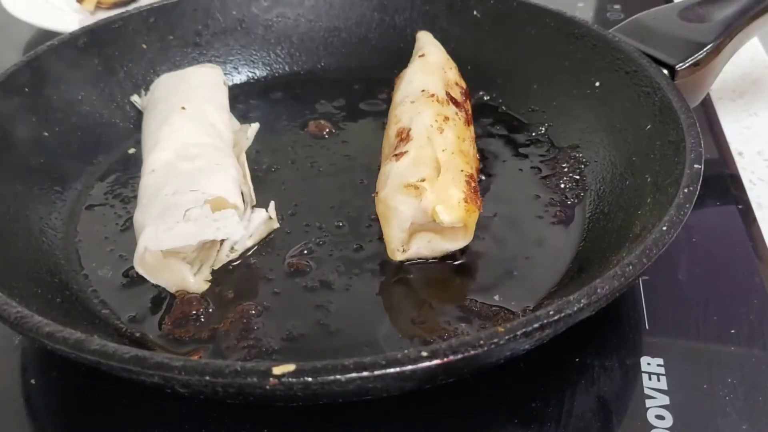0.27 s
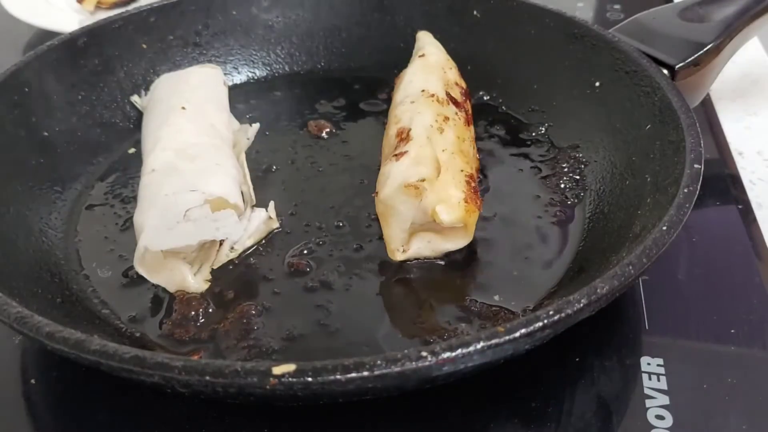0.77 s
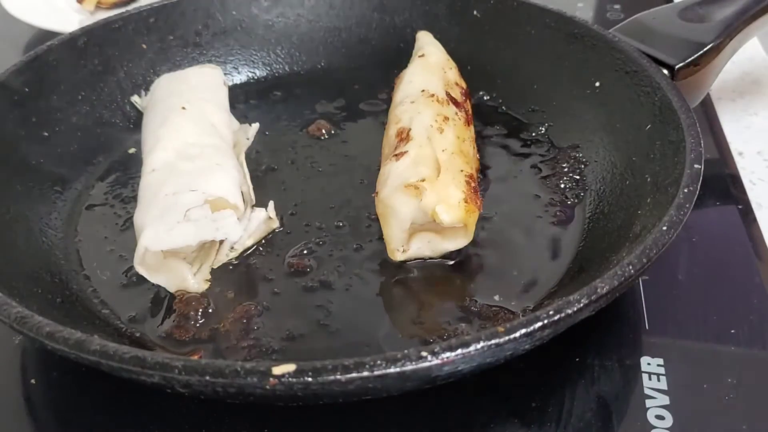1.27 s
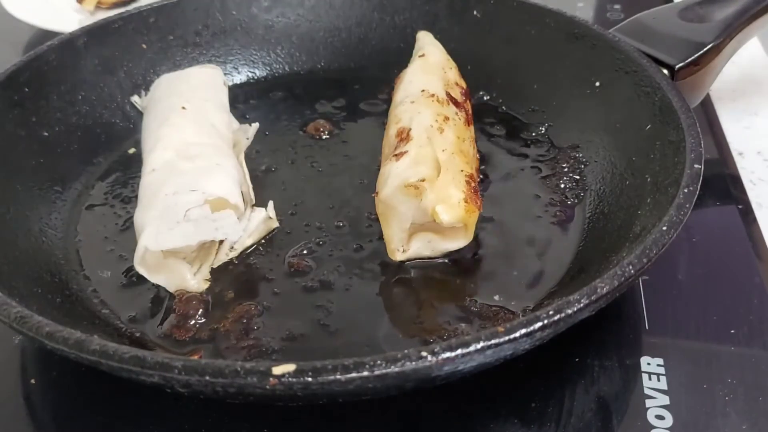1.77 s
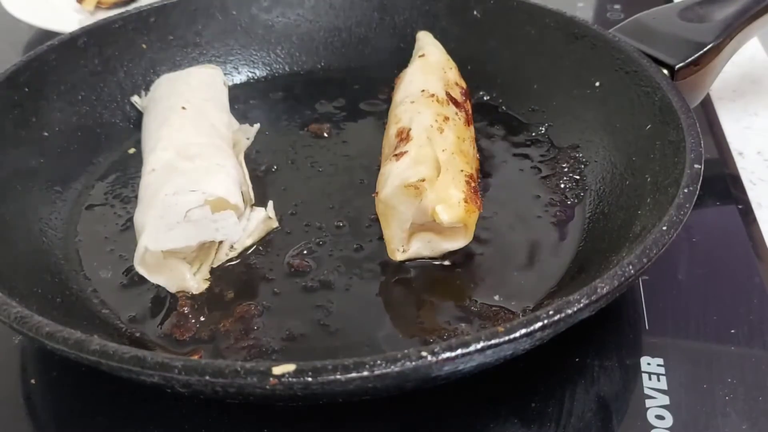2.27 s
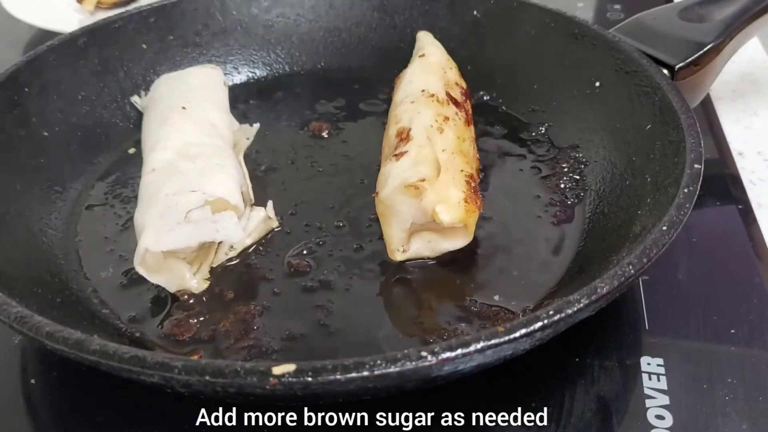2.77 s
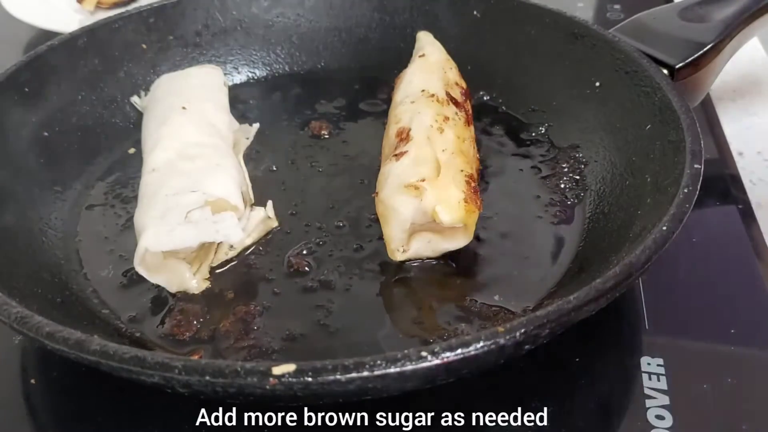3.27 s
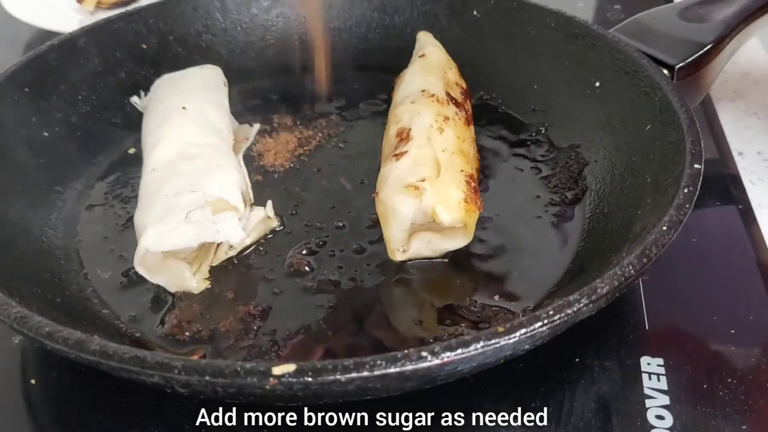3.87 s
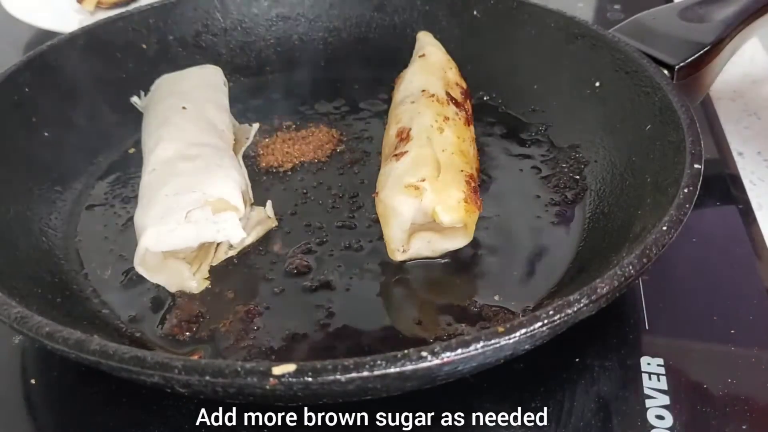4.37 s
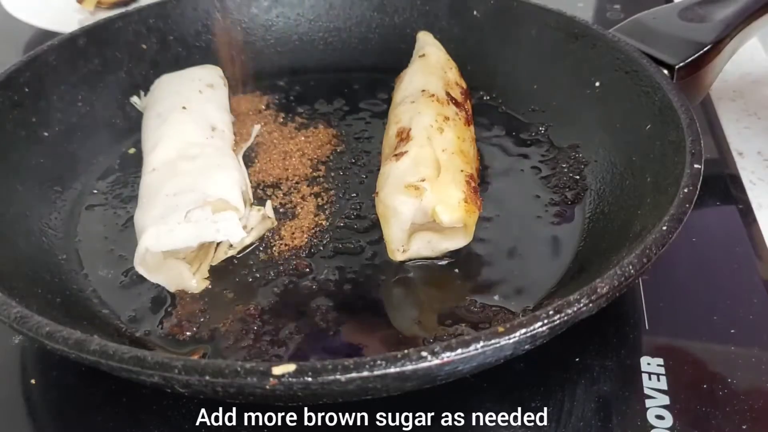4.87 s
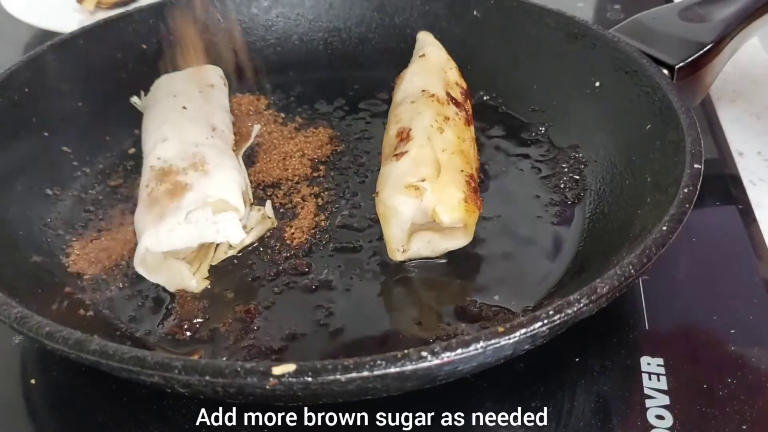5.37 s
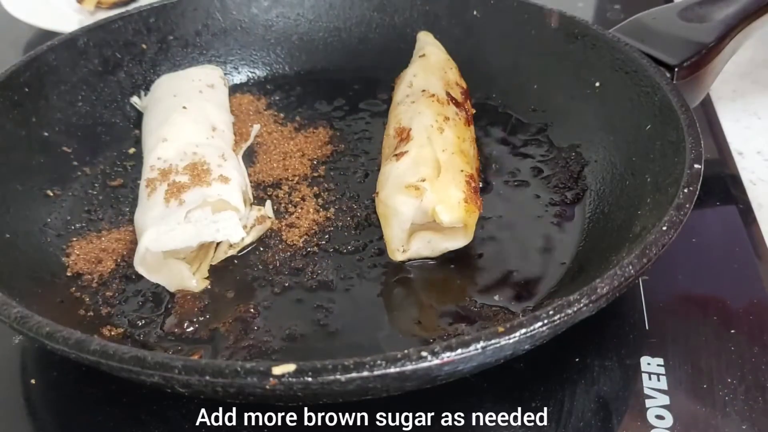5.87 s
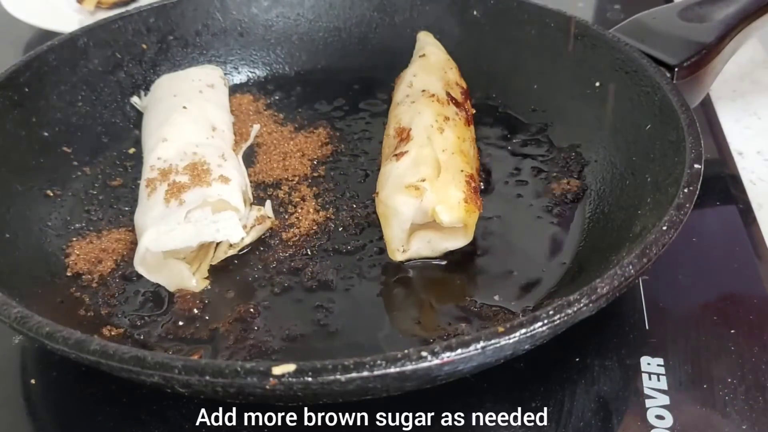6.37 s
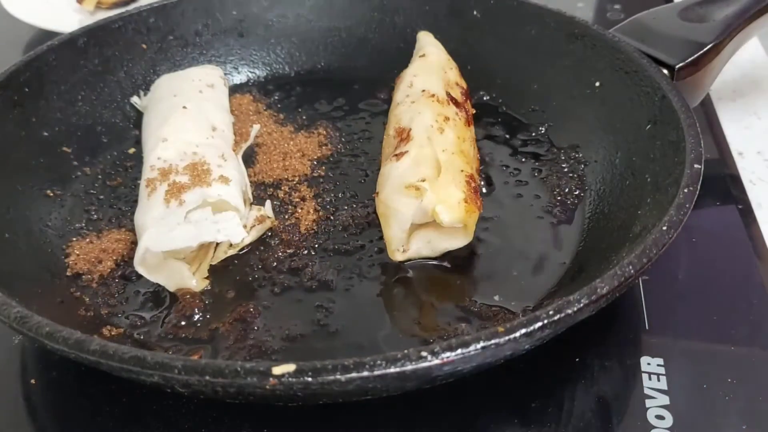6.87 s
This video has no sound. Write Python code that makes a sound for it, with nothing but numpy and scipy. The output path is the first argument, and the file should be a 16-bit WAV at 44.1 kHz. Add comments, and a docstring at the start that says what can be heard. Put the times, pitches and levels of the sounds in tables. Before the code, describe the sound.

Close, dry stereo phone pickup of a kitchen: loud crisp creases of a film packet, irregular and bunched, with hollow body knocks, first leaning left, then right. A soft steady oil sizzle and low room hum sit far below. After the packet stops, only a few light rustles and soft knocks remain, while the frying pan grows lively with high ticking bubbles, pops and spitting clicks.

```python
"""In a kitchen, a stiff sugar bag is handled close to a phone, first left, then right, while rolls fry gently.
Noise in many bands makes the bag's creases snap and rustle; dying tones make its panels ring and its body thump.
Oil hisses as coloured noise, crackles in random ticks and spits in clicks; bubbles pop with a brief ring,
more so once sugar lands in the pan. A low kitchen hum, the bass of the same coloured noise, lies under the sizzle."""
import sys
import numpy as np
from scipy import signal
from scipy.fft import rfft, irfft
from scipy.io import wavfile

SR = 44100
rng = np.random.default_rng(int(sys.argv[2]) if len(sys.argv) > 2 else 0)


def log_audio(samples):
    """Write samples as a 16-bit WAV file to the path given in sys.argv[1]."""
    # one column per channel
    frames = np.atleast_2d(samples).T
    # limit to full scale, then quantise
    limited = np.clip(frames, -1, 1)
    pcm = np.round(limited * 32767).astype(np.int16)
    wavfile.write(sys.argv[1], SR, pcm)


N = 313992
TIME = np.arange(N) / SR
BAG_LAG, PAN_LAG = 20, 8  # samples by which the left port hears later, before the bag's sides are swapped

# creases of the bag snapping; levels before trims and filters:
# start_s, body_db (1.2-4 kHz), crisp_top_db (above 5 kHz)
CREASE_SNAPS = [(0.336, -35, -24), (0.419, -24, -18.5), (0.627, -36.5, -34), (0.638, -33.5, -29.5),
                (0.681, -53, -35), (0.994, -32.5, -27.5), (0.999, -28, -33), (1.009, -45, -53),
                (1.021, -34.5, -48), (1.036, -39, -22), (1.228, -28.5, -30), (1.313, -33.5, -48),
                (1.411, -36, -32), (1.459, -39, -38), (1.4865, -43, -34), (1.523, -39, -33.5),
                (1.559, -26.5, -30), (1.604, -39, -34), (1.629, -27.5, -57), (1.648, -26, -24.5),
                (1.658, -46, -27), (1.671, -38, -35), (1.692, -32, -23), (1.702, -32.5, -25.5),
                (1.722, -32, -56), (1.744, -39, -33.5), (1.774, -18.5, -23.5), (1.81, -29.5, -21),
                (1.883, -30, -45), (1.921, -30, -36), (1.953, -27.5, -20), (1.962, -26.5, -33),
                (2.013, -24, -26.5), (2.116, -24, -31), (2.141, -51, -34), (2.151, -30.5, -25),
                (2.163, -26.5, -23), (2.255, -28.5, -22), (2.275, -35, -39), (2.321, -32.5, -24),
                (2.362, -33.5, -25), (2.446, -31.5, -37), (2.513, -19.5, -15), (2.524, -28, -20),
                (2.596, -24.5, -24.5), (2.654, -20, -17.5), (2.677, -30.5, -23.5), (2.702, -32, -34),
                (2.834, -36.5, -35), (2.848, -33, -35), (2.864, -28.5, -26.5), (2.905, -28.5, -22),
                (2.945, -31, -29), (2.974, -29.5, -43), (3.035, -30, -21.5), (3.085, -27, -27),
                (3.141, -37, -21), (3.253, -34, -23.5), (3.296, -27, -9.5), (3.367, -31.5, -20.5),
                (3.386, -36, -27.5), (3.488, -38.5, -25.5), (3.53, -44.5, -21.5), (3.6, -40, -22)]
# squeezes of the bag; levels before the mix: start_s, hold_s, rustle_db, rumble_db
HAND_SQUEEZES = [(0.332, 0.0077, -37.5, -28), (0.632, 0.0066, -47.5, -44), (1.013, 0.062, -41, -36.5),
                 (1.205, 0.026, -47, -36.5), (1.367, 0.24, -56.5, -53), (1.667, 0.013, -52, -58),
                 (1.804, 0.011, -44.5, -34), (1.945, 0.0047, -46, -32), (2.075, 0.02, -50, -36.5),
                 (2.416, 0.1, -52, -34.5), (2.618, 0.081, -45, -41), (2.881, 0.22, -53.5, -38.5),
                 (3.734, 0.01, -50.5, -52.5), (4.564, 0.035, -52, -48.5), (5.116, 0.027, -50.5, -51.5)]


def bag():
    """Patches of film from large (low) to small (high) ring when a crease cracks, each crack in its own colour."""
    # tone of the bag's film: frequency_hz, gain_db
    film_tone = [(40, 1.5), (100, 3.5), (400, 14), (720, 15), (850, 7), (1500, 10.5), (1770, 13.5),
                 (1900, 10.5), (2110, 13.5), (2400, 8), (3200, 8.5), (4200, 6.5), (5000, 4), (10500, 1),
                 (12500, -2.5), (16000, -1)]
    s, body_db, top_db = np.transpose(CREASE_SNAPS)
    rustle, rumble = (squeeze(db) for db in np.transpose(HAND_SQUEEZES)[2:])
    air = ports(BAG_LAG, alike=0.4)
    creases = grains(rate=500, spread_db=5.5, t60=0.014)
    out = 0
    for hz in np.geomspace(60, 15000, num=17):
        # the level slides from body to crisp top over the octave above 2.3 kHz
        crisp = np.clip(np.log2(hz / 2300), 0, 1)
        scatter_db = 4.5 * rng.standard_normal(len(s))
        crack_db = crisp * top_db + (1 - crisp) * body_db + scatter_db
        snap = fade(s, crack_db, t60=0.0044)
        tail = fade(s, crack_db - 14.5, t60=0.068 + 40 / hz)
        crack = snap + tail
        own = grains(rate=90, spread_db=6.5, t60=0.079 + 8 / hz)
        if hz < 900:
            shake = undb(-13.0) * crack + rumble * (0.2 * creases + 0.091 * own)
        else:
            shake = undb(-5.5) * crack + rustle * (0.5 * creases + 0.18 * own + 0.18)
        # the instant the crease flips
        tick = fade(s, crack_db - 2.5, t60=0.0005)
        patch = band(air * shake + delay_left(tick, BAG_LAG), hz / 1.19, hz * 1.19)
        # neighbouring patches alternate in sign and so add up evenly
        out = patch - out
    return np.array([colour(x, film_tone) for x in out])


def squeeze(level_db):
    """Gain of the hand's work: each squeeze swells, holds and lets go."""
    grip_db_per_s, relax_db_per_s = 494, 161  # swell of the squeeze, settling of the film
    s, hold = np.transpose(HAND_SQUEEZES)[:2, :, None]
    swell_db = grip_db_per_s * np.maximum(s - TIME, 0)
    settle_db = relax_db_per_s * np.maximum(TIME - s - hold, 0)
    return undb(level_db[:, None] - (swell_db + settle_db)).sum(axis=0)


def panels():
    """Each crack leaves two flat panels of the bag ringing briefly, a low and a high one, at random pitches."""
    s, body_db = np.transpose(CREASE_SNAPS)[:2]
    low, high = rng.random((len(s), 2)).T
    low_ring = chimes(s, body_db - 8.5, 380 + 350 * low, cycles=23.4)
    high_ring = chimes(s, body_db - 14.0, 1700 + 600 * high, cycles=74)
    return delay_left(low_ring + high_ring, BAG_LAG)


def thumps():
    """Soft knocks: a few cycles at a low pitch with a rough tail, and one longer hollow tone."""
    # dull knocks, mostly of the bag's body; level before trims: start_s, level_db, pitch_hz
    knock_events = [(0.31, -30.5, 87.5), (0.405, -24, 279), (0.995, -24, 230), (1.051, -26, 201),
                    (1.209, -15.5, 400), (1.622, -18.5, 473), (1.779, -22, 670), (1.951, -29.5, 126),
                    (2.119, -27, 131), (2.418, -23, 236), (2.512, -10.5, 514), (2.647, -16.5, 390),
                    (4.56, -41, 203), (4.712, -26, 580), (4.779, -22, 970), (6.013, -26, 520),
                    (6.642, -45, 87), (6.899, -30, 530)]
    # a short hollow tone; level before the mix: start_s, level_db, pitch_hz
    hollow_tone = [(5.13, -47, 367)]
    s, level_db, pitch_hz = np.transpose(knock_events)
    knock = chimes(s, level_db - 1, pitch_hz, cycles=5.5)
    rough_tail = rings(s, level_db - 14, pitch_hz, spread=1.252, cycles=22.4)
    hoot = chimes(*np.transpose(hollow_tone), cycles=90)
    return delay_left(knock + rough_tail + hoot, BAG_LAG)


def pops():
    """A bursting bubble ticks and rings at its own pitch; the pan wall sends each port a wider, longer echo."""
    # bubbles that burst with a ring; level before trims: start_s, level_db, ring_hz
    bursts = [(0.0982, -32, 6460), (0.5726, -35.5, 5850), (0.7856, -33.5, 5770), (1.4626, -26, 6100),
              (2.3765, -27, 7300), (3.8033, -24, 5700), (3.8134, -31, 6800), (4.0652, -28.5, 6000),
              (4.2712, -23.5, 4580), (4.6503, -29, 5360), (4.8339, -27, 9950), (5.0574, -24, 6300),
              (5.221, -24, 6740), (5.2774, -24, 8900), (5.3448, -27, 6140), (5.4131, -29.5, 6750),
              (5.5862, -20, 8300), (5.6077, -25, 8400), (5.6521, -30, 5500), (5.7129, -21.5, 5500),
              (5.7633, -26.5, 4930), (5.8845, -25, 8500), (5.9065, -26, 5960), (5.9184, -23, 6360),
              (5.9504, -19.5, 6870), (5.9674, -25, 8660), (6.0407, -24.5, 8000), (6.0611, -24.5, 6820),
              (6.0721, -23, 4590), (6.098, -23.5, 7800), (6.117, -24.5, 5000), (6.1784, -22, 7040),
              (6.2233, -25.5, 7300), (6.3255, -29.5, 5440), (6.3415, -22, 6360), (6.5386, -26, 7900),
              (6.6882, -21, 6140), (7.0833, -26.5, 6170)]
    s, level_db, ring_hz = np.transpose(bursts)
    ring = chimes(s, level_db - 5.0, ring_hz, cycles=45)
    left_echo, right_echo = (rings(s, level_db - 5.5, ring_hz, spread=1.11, cycles=330) for _ in range(2))
    air = unit(band(ports(PAN_LAG, alike=0.24), 1000, 9300))
    click = air * fade(s, level_db - 10.0, t60=0.009)
    return delay_left(ring, PAN_LAG) + np.array([left_echo, right_echo]) + click


def spits():
    """A spit of oil is a broad click with a short hiss behind it and a duller spatter, all without a pitch."""
    # oil spitting; levels before trims: start_s, click_db, spatter_db (0.4-2.9 kHz)
    oil_spits = [(4.0757, -33, -46.5), (4.1154, -33.5, -51), (4.4612, -26, -62), (4.4699, -21.5, -48),
                 (4.549, -27.5, -44), (4.6199, -31.5, -43), (4.7267, -34.5, -49), (5.1495, -27, -45.5),
                 (5.5544, -14, -32), (5.5809, -24, -36), (5.7985, -21, -48), (5.8702, -30, -46),
                 (5.927, -28, -51), (6.066, -39, -37), (6.2327, -21.5, -42.5), (6.4464, -39, -45.5),
                 (6.5035, -27, -43), (6.7, -23.5, -55), (6.7192, -34, -50)]
    s, click_db, spatter_db = np.transpose(oil_spits)
    air = ports(PAN_LAG, alike=0.14)
    click_air = unit(band(air, 1700, 10400))
    spatter_air = unit(band(band(air, 400, 2900), 300, 4000))
    click = fade(s, click_db - 2.5, t60=0.0017) + fade(s, click_db - 14.0, t60=0.089)
    spatter = fade(s, spatter_db + 3.5, t60=0.032) + fade(s, spatter_db - 4.0, t60=0.12)
    return click_air * click + spatter_air * spatter


def crackle():
    """Many small bubbles tick at random in bands from low to high, strongest near 6.5 kHz."""
    # how busily the oil crackles, a gain joined by straight lines: time_s, gain_db
    busy_curve = [(0, -60.5), (3.5, -55.5), (4.5, -62.5), (4.7, -53), (5, -57.5), (5.5, -49), (6.3, -45.5),
                  (6.52, -50), (6.62, -59.5), (6.7, -52.5), (7.12, -53.5)]
    busy = undb(np.interp(TIME, *np.transpose(busy_curve)))
    air = ports(PAN_LAG, alike=0.1)
    shared = grains(rate=80, spread_db=4, t60=0.008)
    out = 0
    for hz in np.geomspace(400, 14500, num=14):
        ticks = 0.4 * shared + grains(rate=150, spread_db=4.5, t60=0.03)
        weight = 0.6 + 1.1 * np.exp(-(np.log(hz / 6500) / 0.35) ** 2)
        # neighbouring bands alternate in sign and so add up evenly
        out = weight * band(air * ticks, hz / 1.15, hz * 1.15) - out
    return busy * out


def hiss():
    """Fine sizzle over the kitchen's hum, both coloured noise; only the bass is alike left and right."""
    # tone of sizzle and hum: frequency_hz, gain_db (relative)
    fry_tone = [(25, -6), (102, 4.5), (242, -0.5), (301, 1.5), (575, 6.5), (1610, 1), (1940, 7),
                (3430, -1.5), (12200, -4), (16000, -3.5)]
    mid, side = (colour(rng.standard_normal(N), fry_tone) for _ in range(2))
    side = band(side, 730, 28000)
    both = mid + side * np.array([[1], [-1]])
    return unit(both) * undb(-56)


def undb(db):
    """Decibels to linear gain."""
    return 10 ** (np.asarray(db) / 20)


def unit(x):
    """Scale to an rms of 1."""
    return x / np.sqrt(np.mean(x ** 2))


def band(x, lo_hz, hi_hz):
    """Band-pass, with the upper edge held below 0.45 of the sample rate."""
    sos = signal.butter(2, [lo_hz, min(hi_hz, .45 * SR)], "bandpass", fs=SR, output="sos")
    return signal.sosfilt(sos, x)


def colour(x, table):
    """Causal filter with the gain of a (Hz, dB) table, from the cepstrum."""
    size = 4096
    hz, db = np.transpose(table)
    bins_hz = np.arange(size // 2 + 1) * SR / size
    gain = undb(np.interp(np.log(bins_hz + 1), np.log(hz), db))
    cepstrum = irfft(np.log(gain))
    # folding the cepstrum forward gives minimum phase
    cepstrum[1:size // 2] *= 2
    cepstrum[size // 2 + 1:] = 0
    response = irfft(np.exp(rfft(cepstrum)))
    return signal.fftconvolve(x, response)[:N]


def fade(s, db, t60):
    """Envelope that jumps at each time and dies away by 60 dB in t60 seconds."""
    kicks = np.zeros(N)
    np.add.at(kicks, np.clip((np.asarray(s) * SR).astype(int), 0, N - 1), undb(db))
    return signal.lfilter([1], [1, -np.exp(-np.log(1000) / (t60 * SR))], kicks)


def grains(rate, spread_db, t60):
    """Envelope of random ticks, a rate of them per second, many small and few large; rms 1."""
    chance = rng.random((6000, 2))[:int(rate * N / SR)]
    start_s = chance[:, 0] * N / SR
    size_db = np.minimum(-spread_db * np.log(1 - chance[:, 1]), 3 * spread_db)
    return unit(fade(start_s, size_db, t60))


def chimes(s, peak_db, pitch_hz, cycles):
    """Dying tones, each at its own pitch, that swell within a cycle and last a number of cycles."""
    out = np.zeros(N + SR)
    for at, db, hz in zip(s, peak_db, pitch_hz):
        turns = np.arange(int(cycles / hz * SR)) * hz / SR
        shape = np.minimum(turns, 1) * np.exp(-np.log(1000) * turns / cycles)
        out[int(at * SR):][:len(turns)] += undb(db) * shape * np.sin(2 * np.pi * turns)
    return out[:N]


def rings(s, peak_db, pitch_hz, spread, cycles):
    """Short noise puffs through a narrow band, each at its own pitch, fading over a number of cycles."""
    t = np.arange(SR // 5) / SR
    out = np.zeros(N + len(t))
    puffs = rng.standard_normal((len(s), len(t)))
    for at, db, hz, puff in zip(s, peak_db, pitch_hz, puffs):
        dying = puff * np.exp(-np.log(1000) * t * hz / cycles)
        ring = band(dying, hz / spread, hz * spread)
        out[int(at * SR):][:len(t)] += undb(db) * ring / np.abs(ring).max()
    return out[:N]


def delay_left(x, lag):
    """One sound at two ports, reaching the left one a few samples later."""
    return np.array([np.roll(x, lag), x])


def ports(lag, alike):
    """Noise at two ports: a shared part that reaches the left one later, and a part of its own for each."""
    shared, own = rng.standard_normal(N), rng.standard_normal((2, N))
    return np.sqrt(alike) * delay_left(shared, lag) + np.sqrt(1 - alike) * own


def place(pan_db):
    """Gains of the left and right channel, pan_db apart; negative leans right."""
    return undb([[pan_db / 2], [-pan_db / 2]])


def scene():
    """The bag in the hand, on the left and then on the right, over the frying pan and the kitchen."""
    cross_s = 0.9  # the bag is on the right from here on
    hand = (bag() + panels() + thumps()) * place(pan_db=-3.0)
    hand = np.where(TIME < cross_s, hand[::-1], hand)
    pan = (pops() + spits() + crackle()) * place(pan_db=-2.0)
    return hand + pan + hiss()


def record(dry):
    """The microphone ports lift the air near 13 kHz, the right one more; the phone cuts the top."""
    top_hz = 15750
    lifted = dry + undb([[-12], [-3.5]]) * band(dry, 11300, 15200)
    return signal.sosfilt(signal.ellip(12, .2, 70, top_hz, fs=SR, output="sos"), lifted)


dry = scene()
out = record(dry)
log_audio(out)
```